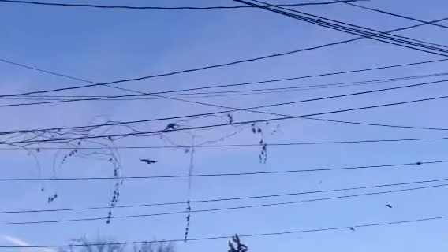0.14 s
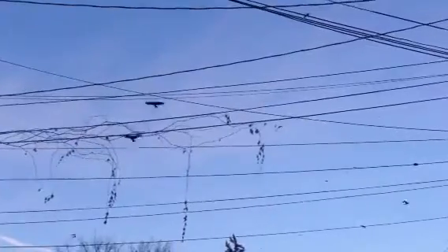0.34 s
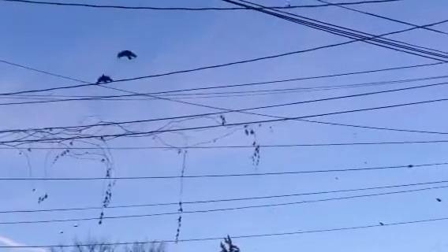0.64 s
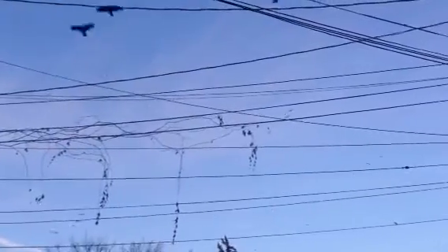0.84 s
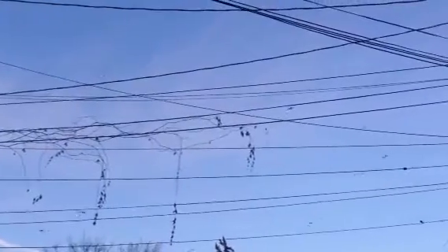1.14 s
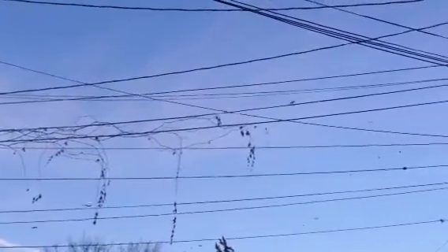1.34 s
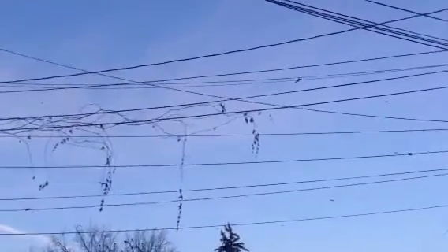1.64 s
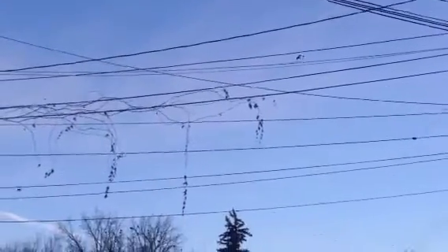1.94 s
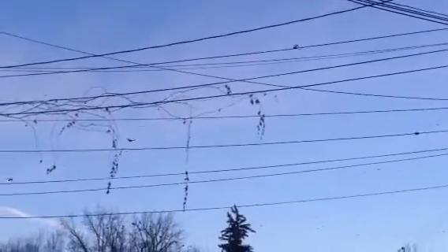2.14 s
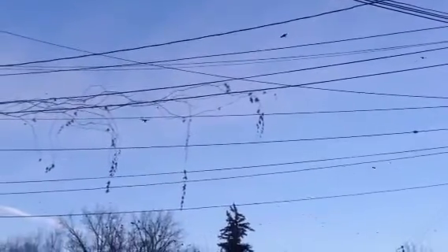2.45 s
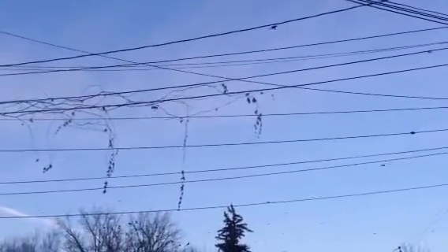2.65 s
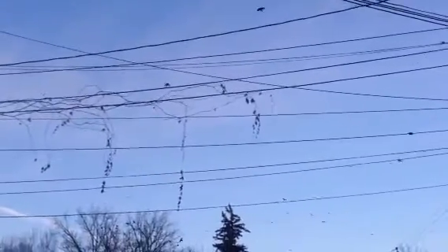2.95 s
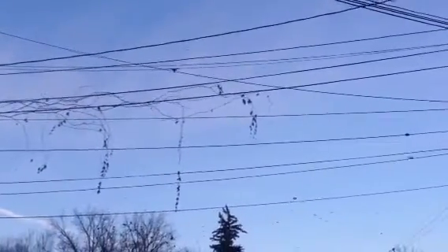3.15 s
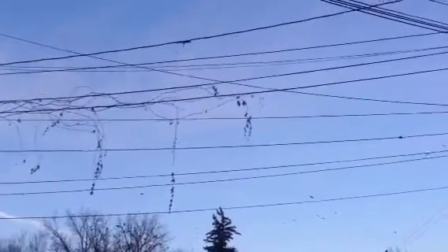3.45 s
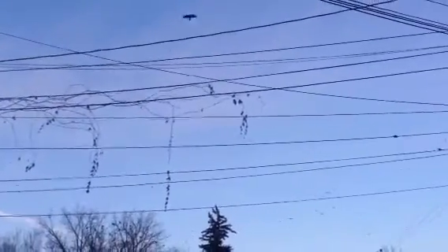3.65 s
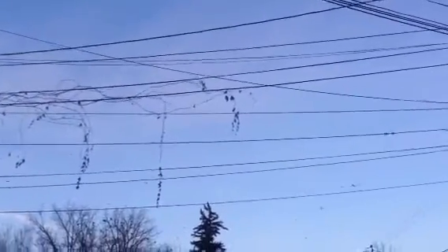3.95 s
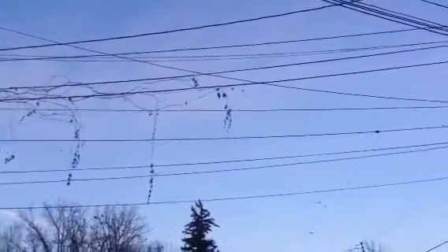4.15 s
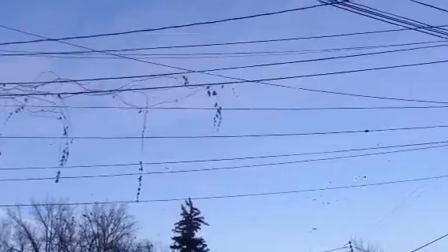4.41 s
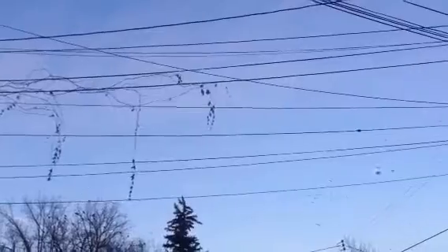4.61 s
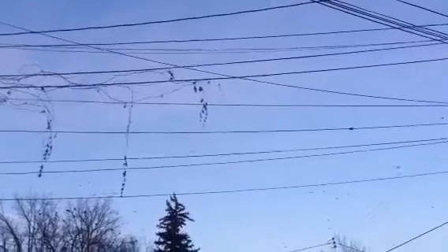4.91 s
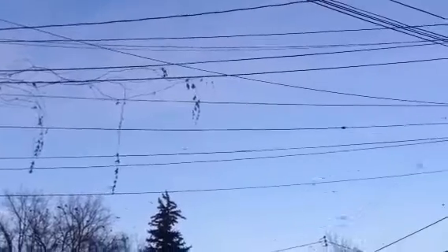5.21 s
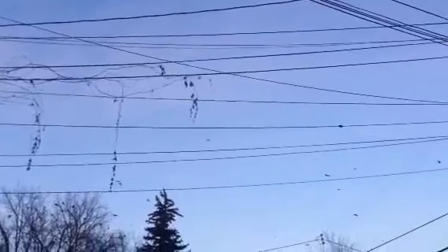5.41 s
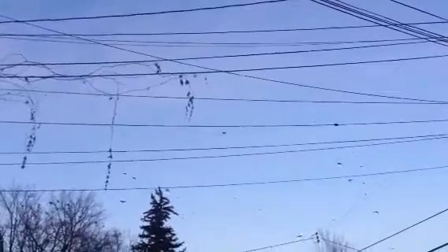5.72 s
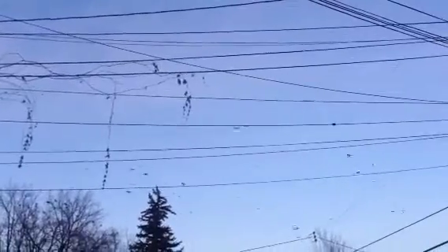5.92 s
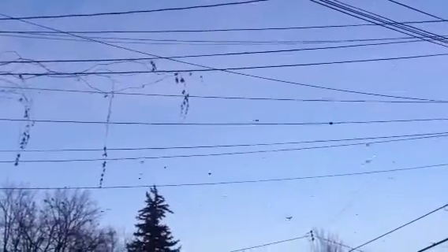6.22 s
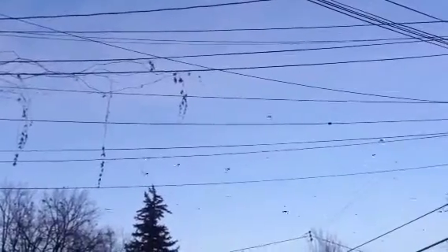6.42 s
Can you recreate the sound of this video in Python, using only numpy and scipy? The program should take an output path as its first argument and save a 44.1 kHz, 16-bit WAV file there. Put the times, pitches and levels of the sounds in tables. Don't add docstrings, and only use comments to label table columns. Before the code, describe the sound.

A large flock of crows caws in an overlapping raspy chorus over a suburban street, with one long dry rattle and faint low traffic rumble.

```python
import sys
import numpy as np
from scipy import signal
from scipy.fft import rfft, irfft
from scipy.io import wavfile
from scipy.ndimage import uniform_filter1d, map_coordinates

SR = 44100
rng = np.random.default_rng(int(sys.argv[2]) if len(sys.argv) > 2 else 0)


def gain_from_db(level_db):
    decades = np.asarray(level_db, float) / 20
    return 10 ** decades


def generate_wav(sig):
    pcm = np.round(np.clip(np.atleast_2d(sig).T, -1, 1) * 32767).astype(np.int16)
    wavfile.write(sys.argv[1], SR, pcm)


N = 289737

# (frequency [Hz], level [dB])
THROAT = [(400, -28), (750, -21), (1050, -9), (1250, -1), (1500, 0), (1900, -9), (2250, -16), (2750, -36),
          (3450, -25), (4100, -26), (4700, -30), (5800, -30), (7300, -37), (10000, -45)]
STREET_T60_S = 0.76


def near_crows():
    # (start [s], length [s], level [dB], top pitch [Hz], rasp lift [dB])
    falling = [
        (-.1, .31, -49.5, 627.6, 6.5),
        (0.479, 0.23, -43, 709.5, 6),
        (3.291, .22, -45, 714.4, -2),
        (5.064, 0.25, -53, 653.6, 3),
    ]
    arched = [
        (2.732, 0.11, -40.5, 712.6, -2),
        (3.096, 0.16, -43.5, 722, 0),
        (3.809, 0.11, -40, 706.5, -10),
        (4.22, 0.1, -41.5, 720, -9),
    ]
    ringing = [
        (4.93, .12, -47.5, 761, -1),
        (5.65, 0.13, -45, 772, 2),
        (6.009, 0.13, -47.5, 787, 11),
    ]
    gruff = [
        (1.585, .15, -47.5, 665, 3),
        (2.06, .15, -50, 702, 4),
        (2.57, .14, -49.5, 694, 1.6),
        (3.952, .14, -46, 740, 1.6),
        (5.83, 0.12, -47, 650, 10.6),
        (6.2, .14, -45.5, 700, 9.3),
    ]
    hoarse = [
        (0.841, 0.18, -58.5, 628.5, 12.5),
        (1.48, 0.141, -55, 702, 9),
        (2.2, 0.086, -54.5, 624, 11.5),
        (2.35, 0.084, -57, 627, -20),
        (2.87, 0.11, -50, 673, 5),
        (4.55, 0.14, -53, 693, 0),
    ]
    shrill = [
        (2.64, 0.12, -60, 687, 14.6),
        (3.26, 0.24, -51.5, 697, 8.6),
        (3.46, 0.23, -62.5, 659, 20),
        (3.962, 0.13, -55, 682, 10),
        (4.08, 0.29, -53.5, 677.5, 11.6),
    ]
    clear = [
        (1.125, .095, -53, 830, -12),
        (1.36, .105, -53.5, 835, -6),
        (6.345, .125, -47, 825, -2),
    ]
    # (roughness [0-1], top at share of length [0-1], start pitch [share of top],
    # end pitch [share of top], bend of the fall [power], rasp starts above [Hz])
    shapes = [
        (.36, .18, .88, .74, 1.2, 2850),
        (.29, .4, .9, .78, 2.2, 2850),
        (.21, .45, .86, .78, 2.4, 2850),
        (.4, .38, .86, .82, 2.0, 2850),
        (.55, .4, .98, .97, 2.0, 2850),
        (.5, .4, .95, .92, 2.0, 4700),
        (.06, .42, .82, .78, 2.0, 2850),
    ]
    # (start against top [dB], end against top [dB],
    # third harmonic lift at the top [dB], upper harmonics lift [dB])
    efforts = [
        (-9, -13, -7, -1.5),
        (-12, 2, -12, -6),
        (-5, 2, -1, 1),
        (-10, -6, -5, 0.5),
        (3, -8, 0, 3),
        (-5, -4, 5, 6),
        (0, -21, 9.5, 4.5),
    ]
    third_opens = 0.89
    rasp_level_db, rasp_late = -22.5, 1.48

    out = np.zeros(N + 2 * SR)
    t = np.arange(SR // 3) / SR
    kinds = [falling, arched, ringing, gruff, hoarse, shrill, clear]
    for caws, shape, effort in zip(kinds, shapes, efforts):
        rough, top, from_share, to_share, bend, rasp_hz = shape
        from_db, to_db, third_db, upper_db = effort
        for start_s, length_s, db, top_hz, rasp_db in caws:
            u = np.minimum(t / length_s, 1)
            before = np.maximum(1 - u / top, 0) ** 2
            after = np.maximum((u - top) / (1 - top), 0) ** bend
            hz = top_hz * (1 - (1 - from_share) * before - (1 - to_share) * after)
            fade = np.clip(np.minimum(t / 0.012, (length_s - t) / 0.019), 0, 1)
            loudness = gain_from_db(from_db * before + to_db * after) * fade

            beak = np.abs(np.sin(np.pi * u ** rasp_late))
            buzz = rasp(hz, 1.5 * rough, rasp_hz) * gain_from_db(rasp_level_db + rasp_db) * beak
            third_lift_db = third_db * np.maximum(1 - third_opens * after, 0)
            call = voice(hz, rough, third_lift_db, upper_db, 87.93)

            start = SR + int(start_s * SR)
            caw = np.sqrt(2) * gain_from_db(db - 2.0) * (loudness * call + buzz)
            out[start:start + len(t)] += caw
    return out[SR:SR + N]


def voice(hz, rough, third_db, upper_db, flutter_hz):
    n = len(hz)
    rough = np.clip(rough, 0, 1)
    waver = 1 + .09 * rough * walk(n, 320) + .035 * rough * walk(n, 60)
    phase = 2 * np.pi * np.cumsum(hz * waver) / SR
    beat = 2 * np.pi * np.cumsum(flutter_hz * (1 + 0.303 * walk(n, 40.17))) / SR
    k = np.arange(1, 15)[:, None]
    lift_db = third_db * (k == 3) + upper_db * (k > 3)
    size = on_log(THROAT, k * uniform_filter1d(hz, size=64)) * gain_from_db(lift_db)
    chop = (1 + 1.4 * rough * np.sin(beat)) * gain_from_db(6.0 * rough * walk(n, 120))
    tone = np.sum(size * np.sin(k * phase + 0.287 * k ** 2), axis=0)
    return tone * chop / size[1]


def rasp(hz, rough, lo_hz):
    both = 0
    for pitch_share in (1, .63):
        side = voice(hz * pitch_share, rough, 0, 0, 87.76)
        both = both + unit(band(side, lo_hz, 9000))
    power = uniform_filter1d(both ** 2, size=400)
    return unit(both / (power + .05) ** 0.33)


def rattle(count=23):
    first_s, gap_s, slows_s = 3.4255, .04255, .00008
    level_db, tires_db, ends_db, scatter_db = -44, -.13, -9, 1.1
    k = np.arange(count)
    late, loud = rng.standard_normal((count, 2)).T
    ends = (k == 0) | (k == count - 1)
    times_s = first_s + gap_s * k + slows_s * k ** 2 + 0.0017 * late
    levels_db = level_db + tires_db * k + ends_db * ends + scatter_db * loud
    return blips(np.transpose([times_s, levels_db]), .016, 1700, 2360, 1250, -8)


def taps_and_chip():
    # (time [s], peak level [dB])
    taps = [
        (0.1376, -51),
        (1.5758, -57),
        (1.8048, -58),
        (1.8926, -61),
        (1.9859, -54.5),
        (2.0747, -57),
    ]
    # (time [s], peak level [dB])
    chip = [
        (6.5111, -62),
    ]
    return blips(taps, .006, 3450, 3550, 2050, 3) + blips(chip, .035, 3780, 3720, 1900, -20)


def blips(events, length_s, from_hz, to_hz, low_hz, low_db):
    out = np.zeros(N + SR)
    u = np.linspace(0, 1, int(length_s * SR))
    chances = rng.standard_normal((len(events), 2))
    for (time_s, db), (bend, lag) in zip(events, chances):
        hz = (from_hz + (to_hz - from_hz) * u) * (1 + .012 * bend)
        turn = 2 * np.pi * np.cumsum(hz) / SR
        note = np.sin(turn) + gain_from_db(low_db) * np.sin(turn * low_hz / from_hz + lag)
        note = note * np.sin(np.pi * u) ** 2 * gain_from_db(2.0 * walk(len(u), 300))
        start = int((time_s - .003) * SR)
        out[start:start + len(u)] += gain_from_db(db) * note
    return out[:N]


def far_crows(count=260):
    # (time [s], level [dB], brightness as birds turn this way [dB])
    flock = [(0.0, -52, 3.5), (0.3, -58, -9), (0.62, -55, 9.5), (0.85, -54, -4.5), (1.15, -51, -7),
             (1.388, -58.5, -16), (1.62, -53, -3), (2.03, -57.5, -4), (2.25, -50.5, -1.5), (2.5, -53, -9),
             (2.8, -48.5, -2), (3.3, -52.5, 0), (3.68, -52.5, -3), (4.05, -48, 0), (4.39, -50.5, -2.5),
             (4.8, -53, -4), (5.58, -57.5, -2), (6.2, -52.5, 2.5)]
    out = np.zeros(N + SR)
    for when, long, high, fall, loud, rough in rng.random((count, 6)):
        u = np.linspace(0, 1, int(SR * (.12 + .14 * long)))
        hz = (600 + 200 * high) * (1 - (.5 + .5 * fall) * .9 * (u - .4) ** 2)
        call = voice(hz, 0.31 + .5 * rough, 0, 0, 60 + 50 * high) * on_log(THROAT, 2 * hz)
        start = int(when * (N + SR / 2))
        out[start:start + len(u)] += gain_from_db(-9.0 * loud) * np.sin(np.pi * u) ** 0.098 * call
    direct = unit(out[SR // 4:][:N])
    crowd = direct * gain_from_db(-2.0) + street(direct, STREET_T60_S)

    times_s, *controls = np.transpose(flock)
    db, bright_db = (np.interp(np.arange(N) / SR, times_s, c) for c in controls)
    chorus = 0
    # lowest Hz, highest Hz, share of the brightness, level in dB
    for lo_hz, hi_hz, share, trim_db in [(500, 2450, 0, 0.0), (1780, 2860, .4, -8),
                                         (2850, 6630, 1.1, -13), (4350, 8840, 1.2, -12.0)]:
        part = band(crowd, lo_hz, hi_hz)
        part = part / np.sqrt(uniform_filter1d(part ** 2, size=5000) + 1e-9)
        chorus = chorus + part * gain_from_db(db + share * bright_db + trim_db)
    return chorus


def street(x, t60):
    t = np.arange(SR) / SR
    fade = np.exp(-np.log(1000) * t / max(t60, .05))
    tail = band(rng.standard_normal(SR), 200, 4930) * fade * (t > .012)
    return signal.fftconvolve(x, tail / np.sqrt(np.sum(tail ** 2)))[:N]


def town():
    # (frequency [Hz], level [dB per Hz])
    traffic = [(15, -42), (25, -22.5), (65, -1.5), (123, 2), (248, -8), (335, -8), (445, -14), (657, -13.5),
               (900, -15.5), (1170, -20), (1980, -120)]
    # (time [s], level [dB])
    passing = [
        (0.0, -60),
        (1.22, -61.5),
        (1.46, -77),
        (1.55, -66),
        (2.07, -67),
        (2.1, -63),
        (2.8, -67.5),
        (5.97, -63),
        (6.57, -64.5),
    ]
    # (frequency [Hz], level [dB])
    mains = [(59.2, -74)]
    t = np.arange(N) / SR
    f = np.maximum(np.fft.rfftfreq(N, 1 / SR), 1)
    noise = rfft(rng.standard_normal(N)) * on_log(traffic, f) * (f > 18)
    deep_db = np.interp(t, *np.transpose(passing))
    engines_db = -58 + 0.18 * (deep_db - np.mean(deep_db))
    deep, engines = 0, 0
    for hz in 22 * 2 ** np.arange(0, 10, .5):
        share = np.cos(np.pi * np.clip(np.log2(f / hz), -.5, .5)) ** 2
        part = irfft(noise * share, N) * gain_from_db(.8 * walk(N, 1.3) + .8 * walk(N, 6))
        if hz > 87:
            engines = engines + part
        else:
            deep = deep + part
    out = unit(deep) * gain_from_db(deep_db) + unit(engines) * gain_from_db(engines_db)
    out = out + gain_from_db(-70.5) * unit(band(rng.standard_normal(N), 625, 5860))
    for hz, db in mains:
        out = out + np.sqrt(2) * gain_from_db(db + 2.1 * walk(N, 10)) * np.sin(2 * np.pi * hz * t)
    return out


def unit(x):
    return x / np.sqrt(np.mean(x ** 2))


def on_log(table, hz):
    f, db = np.transpose(table)
    return gain_from_db(np.interp(np.log(hz), np.log(f), db))


def walk(n, rate):
    knots = np.clip(rng.standard_normal(int(n * 600 / SR) + 3), -2, 2)
    return map_coordinates(knots, [np.arange(n) * min(rate, 590) / SR], order=2)


def band(x, lo_hz, hi_hz):
    return signal.sosfilt(signal.butter(4, [lo_hz, hi_hz], "band", fs=SR, output="sos"), x)


def scene():
    near = near_crows() + rattle() + taps_and_chip()
    echo = gain_from_db(-12) * street(near, STREET_T60_S)
    return (near + echo + far_crows() + town())[None]


def roll_off(x):
    return signal.sosfilt(signal.butter(12, 15340, fs=SR, output="sos"), x)


def record(dry):
    f = np.fft.rfftfreq(N, 1 / SR)
    port_db = -7.0 * np.exp(-((f - 2680) / 260) ** 2)
    heard = irfft(rfft(dry) * gain_from_db(port_db), N)
    heard = heard + gain_from_db(-67.0) * rng.standard_normal(dry.shape)
    return roll_off(heard)


dry = scene()
out = record(dry)
generate_wav(out)
```